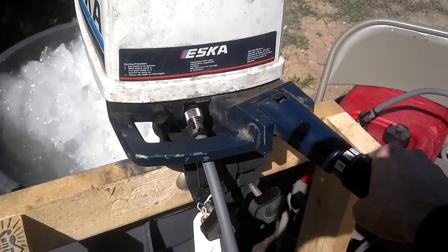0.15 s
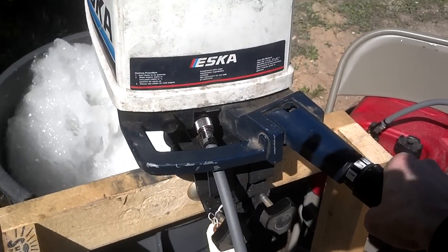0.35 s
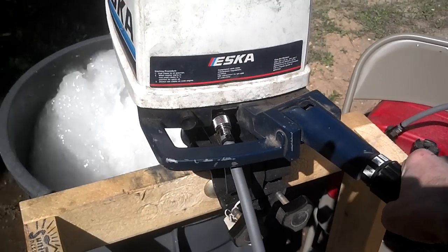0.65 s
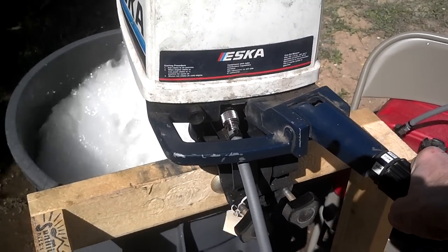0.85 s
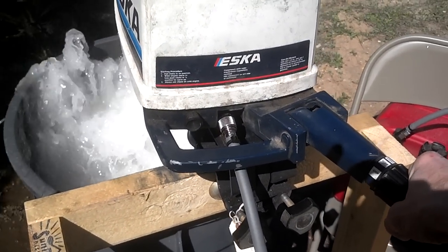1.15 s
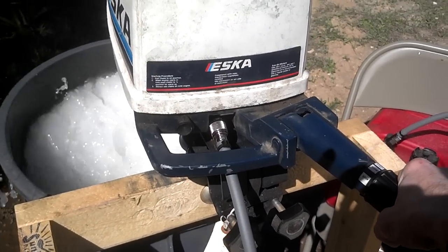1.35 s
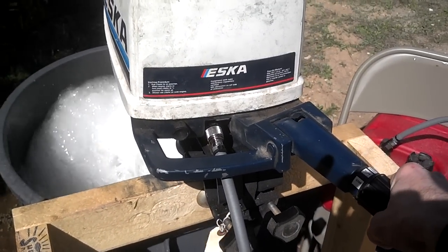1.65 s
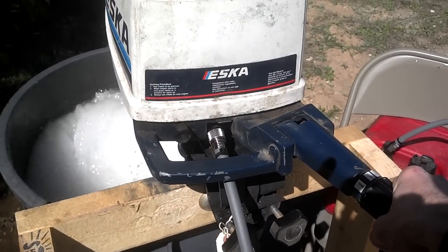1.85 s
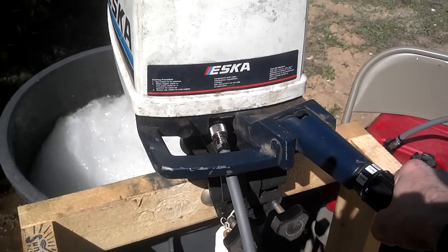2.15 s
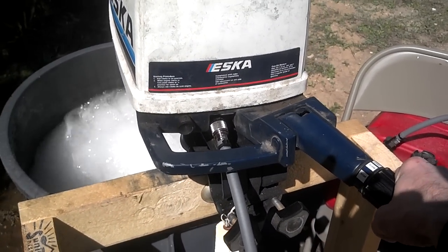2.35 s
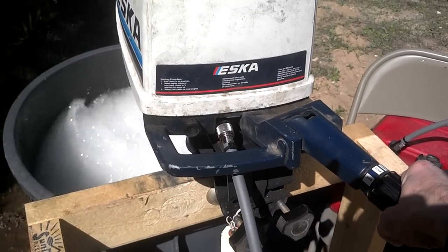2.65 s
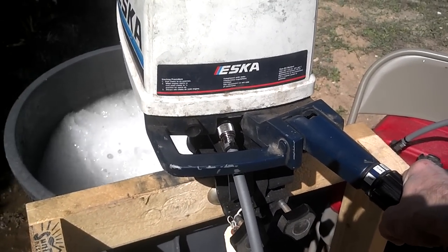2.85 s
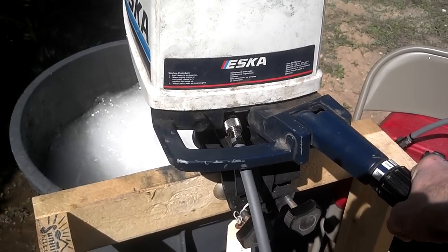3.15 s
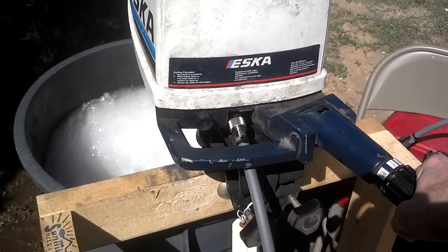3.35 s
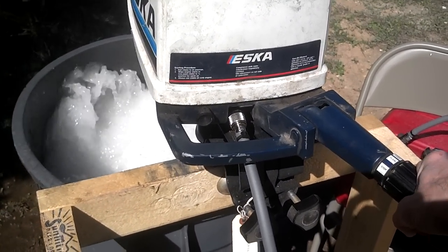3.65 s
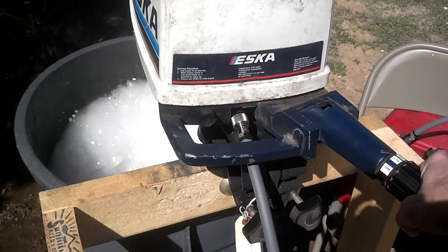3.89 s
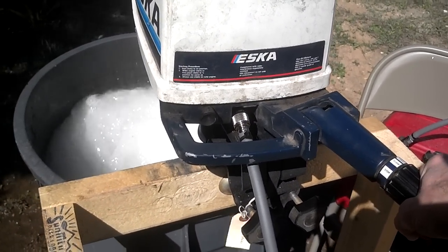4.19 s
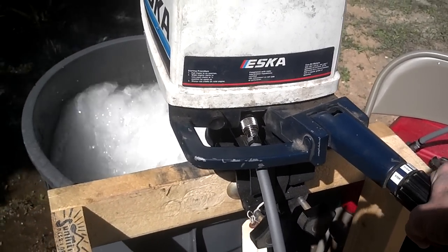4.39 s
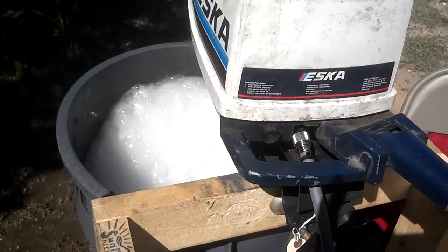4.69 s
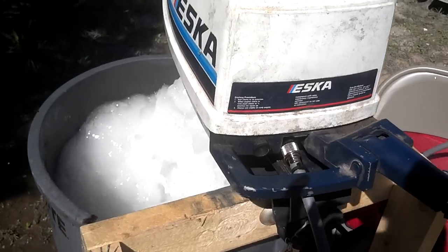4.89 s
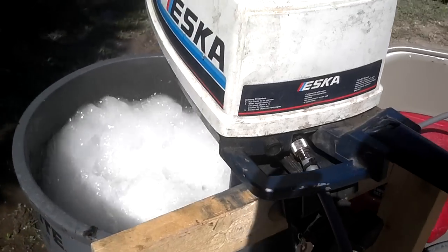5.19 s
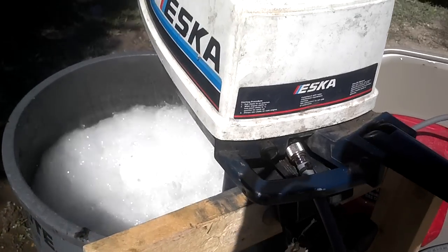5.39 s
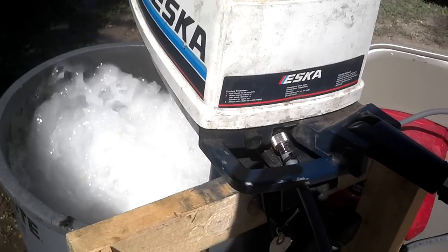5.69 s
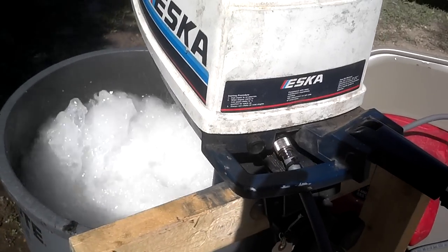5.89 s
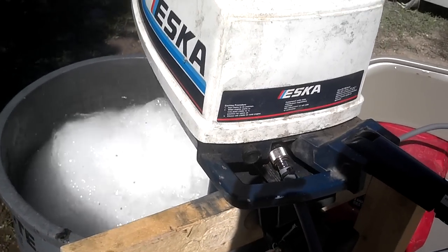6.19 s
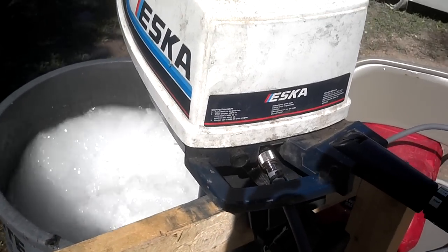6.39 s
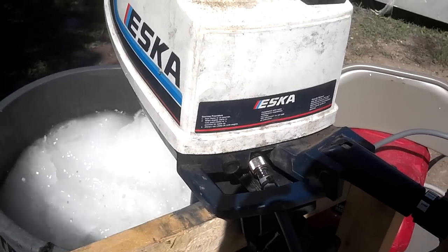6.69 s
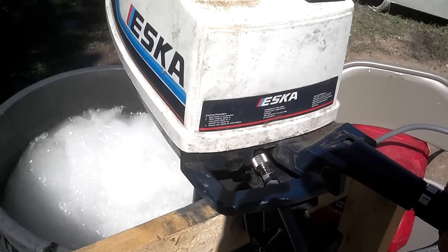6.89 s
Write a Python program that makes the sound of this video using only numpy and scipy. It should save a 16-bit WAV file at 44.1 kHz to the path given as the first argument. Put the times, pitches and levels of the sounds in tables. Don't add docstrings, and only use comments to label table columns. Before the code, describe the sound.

A small two-stroke outboard runs with its leg in a tub of water outdoors. It starts in a fast, rough buzz, falls in pitch over about two seconds, then holds a steady rapid putter with hollow metallic knocks and light ticking. Frothing water hisses underneath throughout. The close handheld stereo microphone moves from tiller to tub near five seconds, bringing the wash and gas hiss forward; slight wind buffets late.

```python
import sys
import numpy as np
from scipy import signal
from scipy.fft import rfft, irfft
from scipy.io import wavfile
from scipy.ndimage import uniform_filter1d

SR = 44100
rng = np.random.default_rng(int(sys.argv[2]) if len(sys.argv) > 2 else 0)


def magnitude_from_level(level_db):
    exponent = np.asarray(level_db, float) / 20
    return 10 ** exponent


def generate_wav(sig):
    pcm = np.round(np.clip(np.atleast_2d(sig).T, -1, 1) * 32767).astype(np.int16)
    wavfile.write(sys.argv[1], SR, pcm)


N = 310464

# (time [s], crank rate [turns/s])
SPEED = [(0.0, 56.98), (0.22, 54.84), (0.37, 55.47), (0.77, 50.26), (0.97, 49.96), (1.6, 41.6),
         (1.82, 39.89), (2.29, 39.16), (3.87, 39.04), (4.18, 38.53), (4.37, 37.56), (4.94, 36.76),
         (5.23, 37.77), (5.6, 38.41), (5.81, 37.22), (5.98, 38.11), (6.2, 36.49), (7.04, 35.39)]
IDLE_TURNS = 38
# (time [s], share [0-1])
VIEW = [
    (0, 0.16),
    (3.7, 0.14),
    (4.8, 0.16),
    (5.5, 1),
    (6.5, 0.88),
    (7.04, 0.64),
]
# (home pitch [Hz], level [dB], share of charge [dB/dB],
# rise with speed [dB/octave], rise at the tub side [dB]); "leg" holds one row per exhaust group
PARTS = dict(cowl=(1083, -26, 1.03, 0, 0.5), panels=(1296, -38.5, 0.5, 14, 0.5),
         tick=(8000, -43.5, 1.03, 5, 0), puff=(12998, -52, 0.7, -8, 10), froth=(3000, -33.5, .5, 3, 2.28),
         leg=[(209, -27.5, 0.56, 2, 2.5), (287, -25, 0.97, -6, 2), (480, -28.5, 0.27, -1.5, 2.5),
         (750, -33.5, 0.61, 5.5, -1)])


def read(points, hz):
    f, value = np.transpose(points)
    return np.interp(np.log(hz + 1), np.log(f + 1), value)


def follow(rows, column=1):
    return np.interp(np.arange(N) / SR, *np.transpose(rows)[[0, column]])


def passing(t, s, length):
    return np.exp(-(2 * (t - s) / length) ** 2)


def evened(x):
    return x / np.sqrt(np.mean(x ** 2) + 1e-20)


def coloured(x, points):
    gain = magnitude_from_level(read(points, np.fft.rfftfreq(N, 1 / SR)))
    return evened(irfft(rfft(x) * gain, N))


def ring(x, hz, width):
    r = np.exp(-np.pi * width / SR)
    w = 2 * np.pi * hz / SR
    return signal.lfilter([0, np.sin(w)], [1, -2 * r * np.cos(w), r * r], x)


def train(at, size, late_ms):
    out = np.zeros(N)
    place = np.clip(at + late_ms * SR / 1000, 0, N - 1).astype(int)
    out[place] = size
    return out


def swell(at, size, late_ms, rise_ms, fall_ms):
    t_ms = np.arange(1500) / SR * 1000
    shape = (1 - np.exp(-t_ms / rise_ms)) * np.exp(-t_ms / fall_ms)
    return signal.oaconvolve(train(at, size, late_ms), shape / shape.max())[:N]


def speed_octaves():
    return np.log2(follow(SPEED) / IDLE_TURNS)


def firings():
    # (time [s], length [s], delay [ms])
    surges = [(.65, .12, .7), (.83, .1, -1.3), (1.17, .1, .6), (1.44, .1, -.6), (1.56, .1, 1.5),
              (1.68, .12, -1.6), (2.2, .1, .8), (2.5, .15, .4), (2.68, .15, -1), (2.98, .2, .8),
              (3.75, .2, .4), (5.95, .1, -1.5), (6.7, .1, .8)]
    first_turn = -.02
    turns = first_turn + np.cumsum(follow(SPEED)) / SR
    at = np.interp(np.arange(int(turns[-1]) + 1), turns, np.arange(N))
    s, length, ms = np.transpose(surges)[:, :, None]
    delay_ms = (ms * passing(at / SR, s, length)).sum(0)
    return at + SR / 1000 * delay_ms


def odd_strokes(at):
    # (time [s], knock [dB], tick [dB], puff [dB])
    odd = [(0.071, -3, -8, -1), (0.342, 0, 3, 7), (0.36, -2, 6, 4.0), (0.736, -5, 9, 6), (1.246, -3, -1, 4),
           (1.61, -2, 3, -1), (1.659, -1.5, 4, 11), (1.757, -4, 7, 2.5), (1.907, 2, 6, 3.5),
           (1.958, 1.5, -8.0, -2), (2.109, -2, 3.5, 7.5), (2.185, 1, 0, -1.5), (2.211, 1, -2.0, -2.5),
           (2.236, -7, -6.0, -5), (2.262, -3.5, 2, -5), (2.287, -8, -3, -6), (2.313, -3, -4, 1),
           (2.517, 1.5, 2, 4), (2.543, -0.5, 2, 0.0), (2.645, -3.0, -11, -7), (2.67, 0, -13, -2.5),
           (2.952, -2, 5.0, 1), (3.131, 0.5, 5, 4.0), (3.156, 2.5, 9, 1), (3.361, 1.5, -2, 1),
           (3.489, -3.5, -1, 2), (3.668, 1.5, 6, -2), (3.694, -4, 4, 3.0), (3.771, -4, -4.5, 2),
           (3.873, -13, 6, 5), (3.924, -9, -16, 0.0), (4.001, 0.0, -12, -3.5), (4.473, 1, 5, -2.5),
           (4.607, -2.5, -12, 2), (4.823, 2, -11, -1), (4.904, -3, -9, -0.5), (4.931, -3, -1, 1.5),
           (4.959, -8, -3.0, 4), (5.067, -1, -3.0, -6.5), (5.12, -3, 3, 4), (5.568, -13, 2, 0),
           (5.62, -9, 4, 7), (5.752, -4.5, -0.5, -1), (5.912, -3, 5, 1), (6.179, 0.0, 2, 2.5),
           (6.427, -5, 5, 0.5), (6.593, 3.5, 8, 3.5), (6.816, 2, -4, -4.0)]
    rows = np.array(odd)
    extra_db = np.zeros((3, len(at)))
    nearest = abs(at / SR - rows[:, :1]).argmin(axis=1)
    extra_db[:, nearest] = rows[:, 1:].T
    return extra_db


def loudness(home_hz, db, share, octave_db, tub_db):
    # (time [s], level [dB])
    charge = [(0, -0.5), (.3, -2), (.65, 0.5), (.9, -3), (1.2, -3), (1.42, -4), (1.57, -7.5), (1.75, -3),
              (2.1, 0.5), (2.45, 1.5), (2.65, 1), (3.05, 1.6), (3.22, -2), (3.45, 0), (4.75, 2), (4.92, -2),
              (5.4, -1), (7.04, -1.5)]
    # (time [s], length [s], level [dB], centre [Hz])
    sways = [(0.23, 0.64, 2.5, 200), (0.61, 0.2, -13, 224), (0.7, 0.21, 6, 312), (0.79, 0.1, 0, 750),
             (0.84, 1.4, 9.5, 1350), (0.67, 0.51, -1.5, 1200), (4.55, 0.4, -3.5, 210),
             (4.57, 0.44, -2.5, 290), (0.65, 0.29, -4, 480), (1.8, 0.35, 0.5, 190), (6.3, .4, -2, 480),
             (6.9, .2, 0, 450), (7.3, 0.11, 0, 450), (2.8, 0.23, 4.5, 1280), (1.41, 0.18, 5, 1240),
             (6.85, 0.22, -2.5, 1087), (6, 0.45, -0.5, 13000), (3.5, 0.3, 2.5, 8000), (0.56, 0.2, 5, 480),
             (1.02, 0.32, -1.5, 480), (3.8, 0.21, 1, 750), (1.126, 0.22, 7, 750), (1.31, 0.5, -7, 280),
             (1.26, 0.46, 11.5, 8000), (1.8, 2.8, -24, 110), (3.1, 0.059, 3, 2400), (3.8, 0.12, 1, 1150),
             (2.66, 0.24, -8, 1180), (1.6, 0.057, -9, 180), (3.12, 0.29, 5, 200), (3.27, 0.21, -9, 237),
             (3.6, 0.26, -3.5, 210), (3.87, 0.26, -1, 195), (4.075, 0.075, -11, 290), (4.4, 0.12, 8, 233),
             (5.12, 0.47, -4.5, 310), (5.25, 0.76, 3.5, 1040), (5.586, 0.035, 6.5, 210),
             (5.75, 0.62, -4.5, 1100), (3.6, 0.083, 3.5, 280), (6.347, 0.26, 2, 1080),
             (6.8, 0.14, -10, 750), (6.85, 0.16, -1, 200), (1.7, 0.37, 3, 1600), (3.8, .3, -4, 1400),
             (6.8, 0.21, -2, 3100), (5.4, 0.73, -1, 3400)]
    reach_octaves = 0.25
    t = np.arange(0, N + 64, 64) / SR
    s, length, sway_db, hz = np.transpose(sways)[:, :, None]
    nearness = np.exp(-(np.log2(hz / home_hz) / reach_octaves) ** 2)
    swayed_db = (sway_db * passing(t, s, length) * nearness).sum(0)
    rules_db = share * follow(charge) + octave_db * speed_octaves() + tub_db * follow(VIEW)
    return magnitude_from_level(db + rules_db + np.interp(np.arange(N) / SR, t, swayed_db))


def knock(at, force_db):
    # (pitch [Hz], burst length [ms], level [dB], time after the firing [ms])
    cowl = [
        [(1093, 3.4, 15, 0.016), (934, 2.1, 4, 0.019), (1589, 5.7, -0.5, 1.203), (780, 0.51, -31, 0)],
        [(1198, 5.2, 5.5, 0), (1890, 4.6, 2, 1.8), (1740, 3, -2, 2.5), (1352, 4.4, 3, 0.6)],
    ]
    place = at.astype(int)[:, None] + np.arange(-300, 300)
    inside = (place >= 0) & (place < N)
    scatter_s = .00004 * (follow(SPEED)[at.astype(int)] / IDLE_TURNS) ** 4
    out = 0
    for group, panels in enumerate(cowl):
        stray = 0.013 * (1 + 2 * group)
        uneven_db = -0.65 + 2 * group
        chance = rng.standard_normal((len(at), len(panels), 3)).transpose(1, 2, 0)
        part = np.zeros(N)
        for (hz, ms, db, after_ms), (size, pitch, late) in zip(panels, chance):
            t = (place - at[:, None]) / SR - .0003 - after_ms / 1000 - (scatter_s * late)[:, None]
            length_ms = ms * np.where(t < 0, 1.15, .85)
            shape = np.exp(-(t * 1000 / length_ms) ** 2)
            strayed_hz = hz * (1 + stray * pitch[:, None])
            tone = -np.cos(2 * np.pi * strayed_hz * (t - .0003))
            level = magnitude_from_level(db + force_db + uneven_db * size)[:, None]
            part[place[inside]] += (level * shape * tone)[inside]
        gain = loudness(*PARTS[("cowl", "panels")[group]])
        out = out + gain * magnitude_from_level(-2.5) * evened(part)
    return out


def mode_lift_db(mode_hz):
    # (time [s], length [s], level [dB], centre [Hz])
    mode_lifts = [(.1, 0.27, 1, 510), (0.099, .3, -2, 284), (0.63, 0.23, 5, 357), (.55, 0.58, -8, 400),
                  (0.75, 0.19, 4.5, 640), (1.4, .4, 2.5, 360), (1.1, .35, -4, 380), (1.35, .25, 13, 555),
                  (1.6, .3, -3, 172), (2, 0.38, -1.5, 440), (2.0, 0.43, 2, 480), (2.6, 0.79, 1.5, 264),
                  (2.4, 0.31, -4, 590), (3, 1, -0.5, 415), (2.8, 0.36, -3.5, 275), (3.12, 0.24, -5, 710),
                  (3.55, .5, 4.5, 466), (3.1, 0.61, 10, 550), (4.2, 0.33, 3, 500), (4.85, .35, 8, 600),
                  (4.85, 0.58, -10, 410), (4.8, .3, 3, 248), (4.93, .2, 1, 290), (5.5, 0.48, 4.5, 390),
                  (5.75, 0.51, 2, 232), (5.9, .3, 5, 510), (5.85, 0.54, 4, 660), (6.35, 0.26, 4, 472),
                  (6.7, 0.85, -8, 385), (6.6, 0.45, -1.5, 300), (6.85, .4, 2, 500), (6.9, .3, 9, 580),
                  (0.8, 0.66, -5.5, 250), (1.3, 0.25, -4.5, 280), (1.17, 0.41, -10, 390), (1.9, .35, 4, 202),
                  (3.59, 0.32, 5, 224), (3.5, .8, -6.5, 700), (2.15, .25, 4.5, 490), (3, .5, 6, 550),
                  (3.7, 0.22, 2, 530), (6.1, 0.25, -3, 530), (5.2, 0.36, -1, 640), (5.7, 0.22, 11, 790),
                  (4.2, .4, 0, 720), (1.28, 0.37, 7, 840), (2.9, 1.5, -3, 635), (5.4, .5, -4, 760),
                  (0.59, .4, 5, 370), (1.1, 0.29, 4.5, 208)]
    reach_hz = 35
    t = np.arange(0, N + 256, 256) / SR
    s, length, db, centre_hz = np.transpose(mode_lifts)[:, :, None]
    bumps = db * passing(t, s, length) * np.exp(-((mode_hz - centre_hz) / reach_hz) ** 2)
    return np.interp(np.arange(N) / SR, t, bumps.sum(0))


def exhaust(at, force_db):
    # (pitch [Hz], width [Hz], level [dB], arrival [ms])
    leg = [
        [(202, 425, -6, 2.18), (235.2, 61.3, -2, 0.13)],
        [(288, 35.8, 32.5, 0.15), (311.3, 32, 27, 0.046), (272, 41.5, 25, 0.21)],
        [(382, 44, -5, 1.77), (409, 81, -3.5, -0.38), (433.7, 29, -3, 0), (453, 75, 0, 0.5), (480, 74, -3.5, 1),
         (507.7, 43, -2, -2.5), (584, 21, -6, 0.5)],
        [(634, 68, 2, -0.46), (713.5, 58, 6, -1.998), (781, 130, -4, 0.264), (890, 53, -2, -0.84),
         (1104, 45, -3.5, 0.84), (1393, 100, -6.5, 1.673)],
    ]
    # (delay at idle [ms], shift with speed [ms/octave])
    leg_ms = [(1, -8), (.5, -14), (-4.8, -6), (-1.8, 1)]
    # (pitch [Hz], rise with speed [dB/octave], rise at the tub side [dB])
    favour = [(321, 13.5, -1), (429, -10, -0.5), (617, 8, 1), (716, -4.5, -0.5), (786, 18, 0)]
    # (time [s], level [dB])
    air_rows = [(0, 0.53), (4.7, 0.36), (4.95, 5.2), (6.0, 6.3), (6.4, 0.73), (7.04, 1.4)]
    air_hz, favour_reach_hz = 529, 25
    blow_db, drift_db, late_scatter_ms = 1.2, 1.7, .08
    rough, rough_octave_db = .36, 6
    air_db, view, octaves = follow(air_rows), follow(VIEW), speed_octaves()
    favoured = np.array(favour)
    gas = evened(rng.standard_normal(N) * (1.8 + swell(at, magnitude_from_level(force_db), 0.54, 3.9, 24.0)))
    gas = gas * magnitude_from_level(rough_octave_db * octaves)
    out = 0
    for group, modes in enumerate(leg):
        chance = rng.standard_normal((len(at), len(modes), 3)).transpose(1, 2, 0)
        idle_ms, octave_ms = leg_ms[group]
        group_ms = idle_ms + octave_ms * octaves[at.astype(int)]
        part = 0
        for (hz, width, db, ms), (size, late, slosh) in zip(modes, chance):
            drift = evened(uniform_filter1d(slosh, size=9))
            stroke_db = force_db + blow_db * size + drift_db * drift
            blow = evened(train(at, magnitude_from_level(stroke_db), ms + group_ms + late_scatter_ms * late))
            near = np.exp(-((hz - favoured[:, 0]) / favour_reach_hz) ** 2) @ favoured[:, 1:]
            lift_db = air_db * np.exp(-((hz - air_hz) / 36.0) ** 2)
            lift_db = lift_db + near[0] * octaves + near[1] * view + mode_lift_db(hz)
            rung = ring(ring(blow + rough * gas, hz, width), hz, 1.91 * width)
            part = part + magnitude_from_level(db + lift_db) * evened(rung)
        out = out + loudness(*PARTS["leg"][group]) * magnitude_from_level(2.5) * evened(part)
    return out


def tick(at, force_db):
    # (frequency [Hz], level [dB per Hz])
    slap_colour = [(2500, -22), (3000, -43), (4200, -23.5), (5600, -9), (6800, 5), (8400, 11), (9500, 4.5),
                   (11000, -27), (16000, -27)]
    # (pitch [Hz], width [Hz], level [dB])
    metal = [(2010, 70, 3), (3090, 110, 2.5), (3725, 45, 3.5), (4545, 45, -6), (4960, 45, -6),
             (6700, 300, -6), (8400, 300, -1.5)]
    size = magnitude_from_level(force_db + 1.8 * rng.standard_normal((len(at), 2)).T)
    late_ms = -0.4 + 1.55 * follow(VIEW)[at.astype(int)]
    level = swell(at, size[0], late_ms, 0.99, 0.91)
    rattle = 0.11 * swell(at, size[1], 6.2, 0.53, 1.6)
    slap = (level + rattle) * rng.standard_normal((2, N))
    chatter = (rng.random((2, N)) < 900 / SR) * rng.standard_normal((2, N))
    struck = evened(slap) + 0.93 * evened(chatter)
    rung = sum(magnitude_from_level(db) * evened(ring(struck, hz, width)) for hz, width, db in metal)
    return loudness(*PARTS["tick"]) * magnitude_from_level(3.0) * (coloured(slap, slap_colour) + 0.3 * evened(rung))


def puff(at, force_db):
    # (frequency [Hz], level [dB per Hz])
    hiss_colour = [(4000, -33), (7000, -13), (10000, 2), (12300, 4.5), (13600, -2), (15200, 12.5),
                   (17000, -6)]
    size = magnitude_from_level(force_db + 1.6 * rng.standard_normal(len(at)))
    level = 0.13 + swell(at, size, .4, 1.5, 2.2)
    hiss = coloured(level * rng.standard_normal((2, N)), hiss_colour)
    return loudness(*PARTS["puff"]) * magnitude_from_level(7.5) * hiss


def froth(at):
    # (frequency [Hz], level [dB per Hz])
    water_colour = [(100, -19), (250, 0), (500, 0), (830, -5), (1150, -5), (1500, -4.5), (1690, -6),
                    (1810, -11), (2000, -3.5), (2550, -14), (2950, -6), (3350, -10.5), (3750, -12),
                    (4100, -14), (4500, -15.5), (4800, -18.5), (5800, -19.5), (8400, -12), (10000, -17.5),
                    (12200, -19), (13300, -28), (14600, -21)]
    patchy_db, grain_db, beat = 1.1, 1.5, 1.3
    draw = rng.standard_normal((N // 64 + 5, 129, 5)).T
    patches = evened(uniform_filter1d(uniform_filter1d(draw[4], 4, 0), 25, 1))
    z = (draw[0:2] + 1j * draw[2:4]) * magnitude_from_level(patchy_db * patches)
    wash = evened(signal.istft(z, nperseg=256, noverlap=192)[1][:, :N])
    burst_size = magnitude_from_level(grain_db * np.minimum(rng.exponential(1, N), 3.5))
    bursts = burst_size * (rng.random(N) < 900 / SR)
    decay = np.exp(-np.arange(200) / 4.4)
    fizz = signal.oaconvolve(bursts, decay)[:N] * rng.standard_normal((2, N))
    push = 1 + beat * swell(at, 0.4, -1.8, 4, 2)
    water = (wash + 0.12 * evened(np.diff(fizz, prepend=0))) * push
    return loudness(*PARTS["froth"]) * magnitude_from_level(5) * coloured(water, water_colour)


def hum(at):
    # (home pitch [Hz], level [dB], share of charge [dB/dB], speed [dB/octave], tub side [dB])
    stand = (110, -31, 1, -28, 0.5)
    return loudness(*stand) * evened(ring(ring(train(at, 1, 4.7), 114.3, 11), 109.6, 17))


def scene():
    at = firings()
    force_db = .5 * rng.standard_normal(len(at))
    knock_db, tick_db, puff_db = odd_strokes(at)
    body = knock(at, force_db + knock_db) + exhaust(at, force_db) + hum(at)
    heave = np.cumsum(uniform_filter1d(rng.standard_normal(N), size=800)) / 30
    off_water = (signal.hilbert(body) * np.exp(1j * heave)).real
    bright = tick(at, force_db + tick_db) + puff(at, force_db + puff_db)
    return np.array([body, off_water]) + bright + froth(at)


def wind():
    # (frequency [Hz], level [dB per Hz])
    wind_colour = [(15, -37), (30, -30), (50, -20), (100, -8), (140, -6), (190, -18), (330, -50),
                   (900, -90)]
    # (time [s], length [s], level [dB])
    gusts = [
        (.8, 0.55, -47),
        (1.7, .3, -58),
        (2.103, 0.48, -49),
        (3.6, .3, -49),
        (4.113, 0.078, -49),
        (4.35, 0.43, -53),
        (6.306, 0.1, -40),
        (6.727, 0.2, -31),
        (6.9, .08, -52),
    ]
    lull_db, lumpy_db = -49, 4.0
    s, length, db = np.transpose(gusts)[:, :, None]
    level = magnitude_from_level(lull_db) + (magnitude_from_level(db) * passing(np.arange(N) / SR, s, length)).sum(0)
    lumps = evened(uniform_filter1d(uniform_filter1d(rng.standard_normal(N), size=1500), size=1500))
    return level * magnitude_from_level(lumpy_db * lumps) * coloured(rng.standard_normal(N), wind_colour)


def top_cut(x):
    return signal.sosfilt(signal.butter(12, 15810, fs=SR, output="sos"), x)


def record(dry):
    # (frequency [Hz], phase [rad])
    turn = [(130, -1.2), (175, -.7), (230, -.5), (510, -.95), (600, .35), (690, 0), (1500, 0), (1720, -.3),
            (1780, -1.2), (1950, -1.45), (2400, -3.1), (2650, -3.3), (3200, -6.05), (3480, -6.28),
            (4150, -6.28), (4400, -4.2), (4650, -3.2), (5200, -3.1), (6600, 0), (7300, 2.7), (8000, 6),
            (9100, 5.8), (12100, -.5), (12700, -3.1), (13400, -3.5), (13700, -6.2), (14400, -6.7),
            (15300, -9.4)]
    # (frequency [Hz], likeness [0-1])
    likeness = [(260, .985), (480, .96), (560, .75), (620, .9), (1000, .97), (1150, .998), (1450, .995),
                (1600, .87), (1740, .5), (1850, .74), (2150, .68), (2300, .8), (2400, .99), (2490, .98),
                (2580, .7), (2700, .3), (2830, .22), (3250, .52), (3480, .99), (3760, .998), (4000, .66),
                (4330, .13), (4750, .86), (5100, .87), (5300, .45), (5600, .48), (6280, .66), (6630, .96),
                (7000, .55), (7650, .16), (8350, .55), (9400, .15), (12300, .3), (12900, .5), (13500, .3)]
    # (frequency [Hz], level [dB])
    lean = [(110, -.4), (150, 3.3), (300, 2.8), (540, 4.8), (650, 3.6), (1200, .3), (1700, -1), (1900, 1.8),
            (2300, 0), (3230, 2), (3600, 0), (4100, -1.5), (4500, 0), (5150, 0), (5800, -4), (7000, 2.2),
            (8400, 11), (10300, 7.5), (13500, 1.5), (15300, 7)]
    low_cut_hz, edge_hz = 159.5, 15780
    soft_top = .8
    hz = np.fft.rfftfreq(N, 1 / SR)
    shared, apart = rfft(dry)
    like = np.clip(read(likeness, hz), 0, 1)
    right = like * np.exp(1j * read(turn, hz)) * shared + np.sqrt(1 - like ** 2) * apart
    ports = irfft(np.array([shared, right / magnitude_from_level(read(lean, hz))]), N)
    rounded = soft_top * np.tanh(ports / soft_top)
    band = (hz < edge_hz) / np.sqrt(1 + (low_cut_hz / (hz + 1)) ** 10)
    ports = irfft(band * rfft(rounded), N)
    blown = ports + wind() * [[1], [-0.67]]
    return top_cut(blown)


dry = scene()
out = record(dry)
generate_wav(out)
```